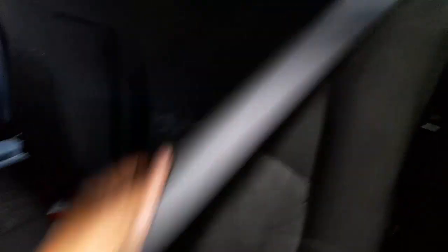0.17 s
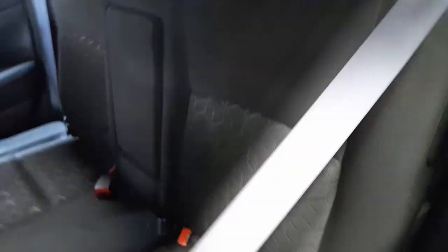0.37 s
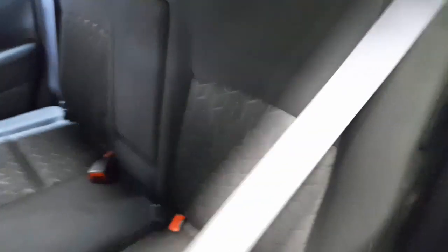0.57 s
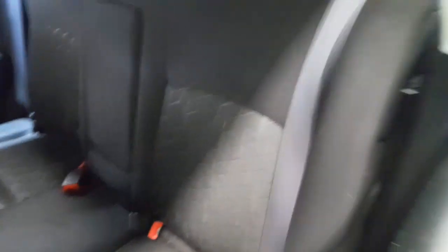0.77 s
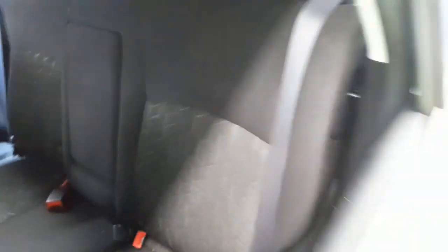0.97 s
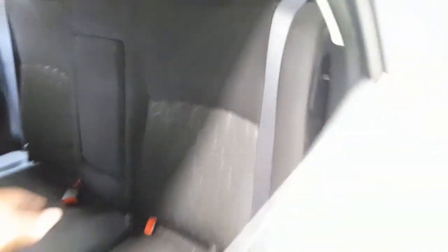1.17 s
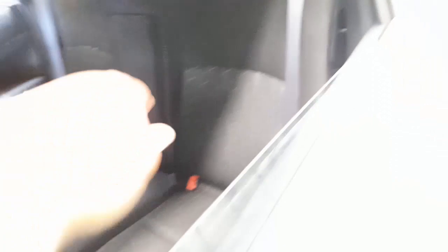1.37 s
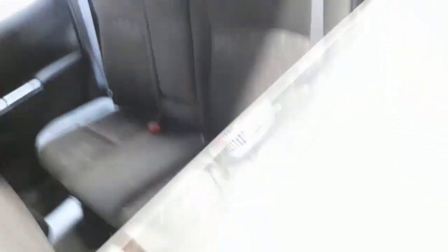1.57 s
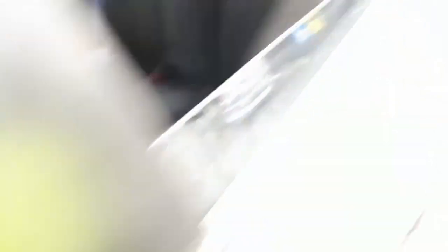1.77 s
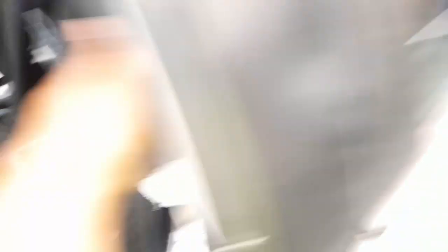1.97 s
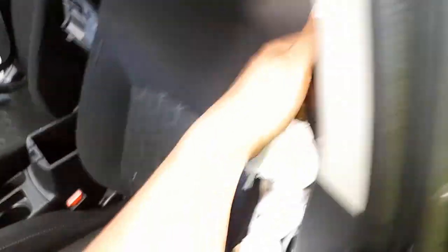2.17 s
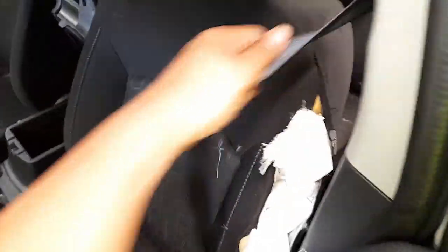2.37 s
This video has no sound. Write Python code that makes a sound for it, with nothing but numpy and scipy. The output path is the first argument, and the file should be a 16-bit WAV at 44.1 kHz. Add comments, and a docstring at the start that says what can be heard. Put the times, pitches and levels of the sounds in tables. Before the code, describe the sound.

A car seat belt is pulled twice with a rising whir and hiss, and the faster second pull locks with a sharp clack. The strap slides back and cloth rustles softly, close by, over a low cabin rumble.

```python
"""Inside a car, a seat belt is drawn twice from its retractor, the case that winds it up. With each
pull the spool whirs up in pitch and the strap hisses through its guide. The second pull is so fast
that the lock catches with a clack that shakes the door pillar. Then the belt slides back and cloth
rustles as the hand reaches for it again, over a low rumble in the cabin."""
import sys
import numpy as np
from scipy import signal
from scipy.fft import rfft, irfft
from scipy.io import wavfile

SR = 44100
rng = np.random.default_rng(int(sys.argv[2]) if len(sys.argv) > 2 else 0)


def store_pcm(level_fs):
    """Save levels as 16-bit WAV."""
    pcm = np.round(np.clip(level_fs, -1, 1) * 32767).astype(np.int16)
    wavfile.write(sys.argv[1], SR, np.atleast_2d(pcm).T)


N = 106192
T, HZ = np.arange(N) / SR, np.fft.rfftfreq(N, 1 / SR)  # sample times, spectrum frequencies
GRAINY = 0.68  # share of a rough noise's power that comes from tiny fibre snaps


def belt_pulls():
    """Two pulls on the belt, each spinning the spool and dragging the strap through its guide."""
    # the spool during each pull: time_s, pitch_hz, lower_tones_db, upper_tones_db
    first_pull = [(.04, 290, -60, -70), (.065, 365, -48, -64), (.10, 400, -60, -72), (.145, 412, -55, -67),
                  (.17, 478, -56, -52), (.187, 590, -53, -55), (.205, 685, -49, -57), (.225, 771, -47, -53),
                  (.25, 838, -51, -56), (.28, 937, -50, -54), (.305, 1001, -47, -60), (.343, 992, -47, -59),
                  (.362, 900, -59, -60), (.387, 778, -58, -66), (.43, 600, -75, -78)]
    fast_pull = [(.61, 700, -75, -75), (.66, 872, -66, -62), (.69, 928, -61, -60), (.72, 940, -62, -63),
                 (.74, 1050, -54, -48), (.757, 1072, -49, -48), (.77, 1165, -54, -58),
                 (.785, 1250, -47, -62), (.81, 1252, -46, -63), (.835, 1302, -51, -52),
                 (.868, 1345, -53, -55), (.885, 1300, -75, -75)]
    # where the guide is heard: frequency_hz, left_minus_right_db
    guide_side = [(100, 1.5), (380, -3.5), (1300, 0.5), (2400, -3.5), (4400, 11), (8000, -0.5), (15000, 3)]
    sound = np.zeros((2, N))
    for pull in (first_pull, fast_pull):
        times, *columns = np.transpose(pull)
        pitch_hz, lower_db, upper_db = (np.interp(T, times, column) for column in columns)
        moving = np.clip(np.minimum(T - times[0], times[-1] - T) / 0.03, 0, 1)  # 30 ms fades
        sound += moving * (spool_whir(pitch_hz, lower_db, upper_db) + strap_hiss(pitch_hz))
    return placed(sound, guide_side)


def spool_whir(pitch_hz, lower_db, upper_db):
    """The spinning spool sings a fluttering stack of tones, coloured by its housing."""
    # the spool's tones: pitch_multiple, level_db
    lower_tones = [(1, -10), (2, -.5)]
    upper_tones = [(3, -11), (4, 1), (5, -16)]
    # what the housing boosts and muffles: frequency_hz, gain_db
    housing = [(300, 0), (1400, 0), (2000, 2), (3000, -2), (4200, 1), (5300, 2), (6300, -10), (9000, -20)]
    flutter = 1 + 0.013 * wobble(rate_hz=190)
    cycles = np.cumsum(pitch_hz * flutter) / SR
    tones = [(multiple, lower_db + db) for multiple, db in lower_tones]
    tones += [(multiple, upper_db + db) for multiple, db in upper_tones]
    # a thin sixth tone fades away as the spool's pitch climbs past 680 Hz
    thin_db = upper_db - 3 - 60 * np.log2(np.maximum(pitch_hz / 680, 1))
    tones.append((6, thin_db))
    whir = np.zeros((2, N))
    for multiple, db in tones:
        roughness = 1 + 0.4 * np.array([wobble(rate_hz=100), wobble(rate_hz=77)])
        ear_offset = 0.25 * rng.random((2, 1))
        whir += gain(db) * roughness * np.sin(2 * np.pi * (multiple * cycles + ear_offset))
    return filtered(whir, spectrum(housing))


def strap_hiss(pitch_hz):
    """The woven strap rubs through its guide, louder the faster the spool turns."""
    # tone of the hiss: frequency_hz, level_db
    hiss_colour = [(40, 9.5), (80, 5), (330, -1), (600, -14.5), (1500, -15), (2600, -18), (4400, -17.5),
                   (7000, -21.5), (9000, -29.5), (12000, -29.5), (16000, -32)]
    fast_pitch_hz, db_per_octave = 1058, 13.5
    hiss_db = -43.5 + db_per_octave * np.log2(pitch_hz / fast_pitch_hz)
    return noise(hiss_colour, GRAINY) * gain(hiss_db)


def lock_knocks():
    """Lock and spool knock: each hit clacks in the retractor and booms in the pillar and cabin."""
    # the hits: start_s, clack_db, treble_tilt_db_per_octave, thump_db
    knocks = [(0.021, -35.5, 0, -44), (0.8725, -12.5, 0, -32), (.8829, -4, -3, -15),
              (.8868, -11, -4.5, -23), (0.8982, -28, -15, -28), (0.925, -29, -16, -25),
              (0.9417, -31.5, -5, -32), (2.312, -49, -4, -64)]
    # ringing tones of pillar and cabin: pitch_hz, level_db, fade_s
    pillar_tones = [(78.8, 1, 0.16), (105, 8, 0.092), (158.3, 2, 0.089), (200.7, 1, 0.087),
                    (225, -0.5, 0.079), (287.2, -9.5, 0.2), (340.5, -8.5, 0.25), (373, -13, 0.27),
                    (423, -17.5, 0.28), (486, -22, 0.096), (562, -18.5, 0.087)]
    # where the lock is heard: frequency_hz, left_minus_right_db
    lock_side = [(60, 2), (200, 2), (380, 2), (700, 0.5), (1290, 3.5), (2380, 1.5), (4400, 9), (8000, -2),
                 (15000, 3)]
    octaves = np.log2(np.clip(HZ, 700, 4000) / 1500)  # the tilt pivots at 1500 Hz
    sound = np.zeros((2, N))
    for start_s, clack_db, tilt, thump_db in knocks:
        sound += filtered(clack(start_s), clack_db + tilt * octaves)
        sound += gain(thump_db) * ring(pillar_tones, start_s, rise_cycles=1.15)
    return placed(sound, lock_side)


def clack(start_s):
    """A sharp crack rings the retractor's frame and echoes briefly in the cabin."""
    # tone of the crack: frequency_hz, level_db
    crack_colour = [(100, 13.5), (650, -15), (1100, 8), (2000, 1.5), (3000, -7.5), (4600, -15.5),
                    (7000, -17.5), (10000, -26), (16000, -22)]
    # ringing tones of the frame: pitch_hz, level_db, fade_s
    frame_tones = [(760, -27, 0.16), (862, -32, 0.04), (1016, -9.5, 0.019), (1167, -9.5, 0.036),
                   (1439, -9, 0.031), (1560, -21, 0.043), (1930, -18, 0.038), (1953, -12, .055),
                   (2700, -41.5, 0.56), (2870, -13, 0.018), (3365, -23, .03), (3650, -30, 0.011),
                   (4400, -24, 0.037), (4670, -23, 0.027), (5900, -33, 0.025)]
    arrival_s = start_s + np.array([[0], [0.0011]])  # the right ear hears the crack later
    direct = gain(-2) * burst(arrival_s, fade_s=0.017)
    echo = gain(-12) * burst(arrival_s, fade_s=0.095)
    crack = noise(crack_colour) * (direct + echo)
    frame = np.array([ring(frame_tones, start_s, scatter_cycles=0.3) for ear in range(2)])
    return 0.5 * (crack + frame)


def sliding():
    """Strap and clothes slide, and a hand rubs along the seat and belt."""
    # loudness of each: time_s, level_db
    slide_levels = [(0, -56.5), (.4, -52.5), (.5, -59), (.58, -58.5), (.68, -59), (.98, -54), (1.06, -52.5),
                    (1.2, -53.5), (1.36, -53), (1.5, -51), (1.65, -48.5), (1.78, -49), (2.02, -50),
                    (2.12, -49.5), (2.23, -46), (2.29, -48.5), (2.41, -45)]
    rub_levels = [(0, -49), (.04, -52), (.08, -51), (.3, -89), (2.0, -50), (2.1, -50.5), (2.21, -42.5),
                  (2.255, -40), (2.3, -32.5), (2.335, -40), (2.41, -38.5)]
    # tone of each: frequency_hz, level_db
    slide_colour = [(100, 9), (600, 0.5), (1000, 0), (2000, -1), (2600, -2.5), (3300, -5.5), (5200, -4.5),
                    (6000, -9), (7200, -7.5), (9000, -15), (11000, -10), (16000, -18)]
    rub_colour = [(30, -30), (70, -14.5), (300, 6), (450, -2), (700, -13), (1150, -8), (2200, -17),
                  (4000, -26), (8000, -31.5), (16000, -42)]
    slide = noise(slide_colour, grainy=0.19) * loudness(slide_levels)
    rub = noise(rub_colour, GRAINY) * loudness(rub_levels)
    return slide + rub


def touches():
    """Brief touches of cloth, arm and belt, each a swell of noise."""
    # when they happen: middle_s, length_s, level_db
    brushes = [(.09, .12, -58), (.25, 0.18, -56), (1.272, 0.067, -47.5), (1.6, 0.12, -55),
               (1.888, 0.058, -48.5), (2.275, 0.11, -48.5), (2.37, 0.13, -46.5)]  # cloth brushes past
    bumps = [(.33, 0.097, -44.5), (.79, 0.084, -40), (1.022, 0.017, -41), (1.53, 0.064, -51),
             (1.9, 0.063, -46)]  # arm and belt bump softly on the seat
    rasps = [(1.603, .025, -51), (1.893, .03, -51), (2.355, .045, -42)]  # the strap scrapes the edge of its guide
    swishes = [(.28, 0.11, -64), (1.195, 0.022, -66), (1.63, .03, -60), (2.22, 0.031, -51.5)]  # strap and sleeve swish lightly
    scuffs = [(.045, 0.053, -57.5), (1.62, 0.26, -52), (2.17, .05, -52), (2.285, 0.066, -46)]  # dull scuffs on the seat cover
    # tone of each kind: frequency_hz, level_db
    brush_colour = [(100, -42), (500, -19), (1000, 2.5), (2400, 5), (3300, -1), (5000, -7), (7000, -9),
                    (9500, -16), (16000, -23)]
    bump_colour = [(25, -48), (55, 3), (72, 0), (120, -6.5), (300, -16), (1000, -94), (16000, -90)]
    rasp_colour = [(300, -40), (1800, -36), (2200, 11), (2450, -13), (3000, -11), (16000, -36)]
    swish_colour = [(1000, -25), (8000, -12), (11000, 1), (13500, -9), (16000, -10)]
    scuff_colour = [(200, -28), (480, -4.5), (650, 3), (850, -5), (1150, -8.5), (2000, -22), (16000, -60)]
    return (noise(brush_colour, GRAINY) * swells(brushes)
            + noise(bump_colour) * swells(bumps)
            + noise(rasp_colour, GRAINY) * swells(rasps)
            + noise(swish_colour, GRAINY) * swells(swishes)
            + noise(scuff_colour, GRAINY) * swells(scuffs))


def cabin_rumble():
    """A low rumble fills the cabin, with a wavering drone in it."""
    # loudness of the rumble: time_s, level_db
    rumble_levels = [(0, -39.5), (.18, -45), (.4, -45), (.6, -47.5), (.75, -43.5), (1.1, -45), (1.35, -42),
                     (1.5, -39), (1.8, -41), (2.05, -40.5), (2.41, -38)]
    # tone of the rumble: frequency_hz, level_db
    rumble_colour = [(20, -10), (40, -9.5), (66, 3), (88, -3), (115, 0.5), (150, -1), (200, -6.5),
                     (310, -9), (420, -15), (620, -17.5), (900, -24.5), (2000, -37), (16000, -46)]
    # path of the drone: time_s, pitch_hz, level_db
    drone_path = [(0, 325, -56), (.35, 335, -53.5), (.55, 320, -57.5), (0.748, 340, -56), (.82, 345, -43),
                  (1.002, 300, -58), (1.2, 280, -55.5), (1.6, 278, -50), (1.848, 295, -53),
                  (1.978, 312, -45), (2.251, 322, -54), (2.41, 335, -46.5)]
    times, pitch_hz, level_db = np.transpose(drone_path)
    cycles = np.cumsum(np.interp(T, times, pitch_hz)) / SR
    waver = wobble(rate_hz=11.2) + 1j * wobble(rate_hz=11.2)  # blurs both level and pitch
    drone = (np.exp(2j * np.pi * cycles) * waver).real * gain(np.interp(T, times, level_db))
    return noise(rumble_colour) * loudness(rumble_levels) + drone


def noise(colour, grainy=0):
    """Stereo noise with a given tone; the share `grainy` of it is tiny fibre snaps."""
    # how alike the two ears are: frequency_hz, likeness (0 to 1)
    ear_likeness = [(30, 0.78), (130, .97), (290, 0.9), (640, 0.55), (1400, 0), (16000, 0)]
    snaps_per_s, spread_db = 2700, 2
    snaps = rng.standard_normal((2, N)) * (rng.random((2, N)) < snaps_per_s / SR)
    snaps = normalised(snaps * gain(spread_db * np.minimum(rng.exponential(1, (2, N)), 4)))
    smooth = rng.standard_normal((2, N))
    left, other = rfft(np.sqrt(1 - grainy) * smooth + np.sqrt(grainy) * snaps)
    alike = np.clip(spectrum(ear_likeness), -1, 1)
    right = alike * left + np.sqrt(1 - alike ** 2) * other
    return normalised(irfft(np.array([left, right]) * gain(spectrum(colour)), N))


def ring(tones, start_s, scatter_cycles=0, rise_cycles=0.35):
    """A struck part rings for half a second; each tone falls 60 dB in its fade_s."""
    first = round(start_s * SR)
    t = np.arange(min(N - first, SR // 2)) / SR
    sound = np.zeros(N)
    for pitch_hz, db, fade_s in tones:
        rise = np.minimum(pitch_hz * t / rise_cycles, 1)
        wave = np.sin(2 * np.pi * (pitch_hz * t + scatter_cycles * rng.random()))
        sound[first:first + len(t)] += rise * gain(db - 60 * t / fade_s) * wave
    return sound


def burst(start_s, fade_s, rise_s=0.0009):
    """A level that jumps up, then falls 60 dB in fade_s."""
    age_s = np.maximum(T - start_s, 0)
    return np.minimum(age_s / rise_s, 1) * gain(-60 * age_s / fade_s)


def swells(rows):
    """One smooth hump in level for each row."""
    return sum(gain(db) * np.exp(-(2 * (T - middle_s) / length_s) ** 2)
               for middle_s, length_s, db in rows)


def wobble(rate_hz):
    """Random wandering, up to about rate_hz fast."""
    return normalised(irfft(rfft(rng.standard_normal(N)) * np.exp(-(HZ / rate_hz) ** 2), N))


def placed(sound, side):
    """Shares a sound between left and right, frequency by frequency."""
    return filtered(sound, spectrum(side) * np.array([[0.5], [-0.5]]))


def filtered(sound, gain_db):
    """Turns each frequency up or down."""
    return irfft(rfft(sound) * gain(gain_db), N)


def spectrum(points):
    """Joins (frequency_hz, value) points into a curve over all frequencies."""
    frequency_hz, value = np.transpose(points)
    return np.interp(np.log(HZ + 1), np.log(frequency_hz), value)


def loudness(points):
    """Joins (time_s, level_db) points into a gain over time."""
    return gain(np.interp(T, *np.transpose(points)))


def gain(db):
    """Turns decibels into a multiplier."""
    return 10 ** (np.asarray(db) / 20)


def normalised(sound):
    """Scales a sound to an average power of 1."""
    return sound / np.sqrt(np.mean(sound ** 2) + 1e-20)


def scene():
    """The pulls and the lock, over the rustling and the cabin's rumble."""
    # where seat and cabin are heard: frequency_hz, left_minus_right_db
    seat_side = [(60, -4), (130, -1), (300, -2.5), (700, 1.5), (1500, -5), (4000, 0), (12000, -1)]
    return belt_pulls() + lock_knocks() + placed(sliding() + touches() + cabin_rumble(), seat_side)


def record(dry):
    """Cuts away the deepest bass and the highest treble."""
    low_cut_hz, high_cut_hz = 56, 15750
    bass_cut = signal.butter(2, low_cut_hz, "highpass", fs=SR, output="sos")
    treble_cut = signal.firwin(511, high_cut_hz, window=("kaiser", 9), fs=SR)
    return signal.oaconvolve(signal.sosfilt(bass_cut, dry), treble_cut[None], "same")


dry = scene()
out = record(dry)
store_pcm(out)
```